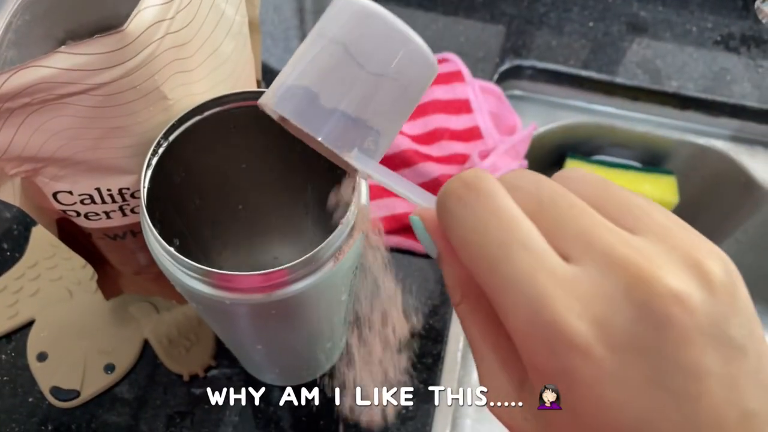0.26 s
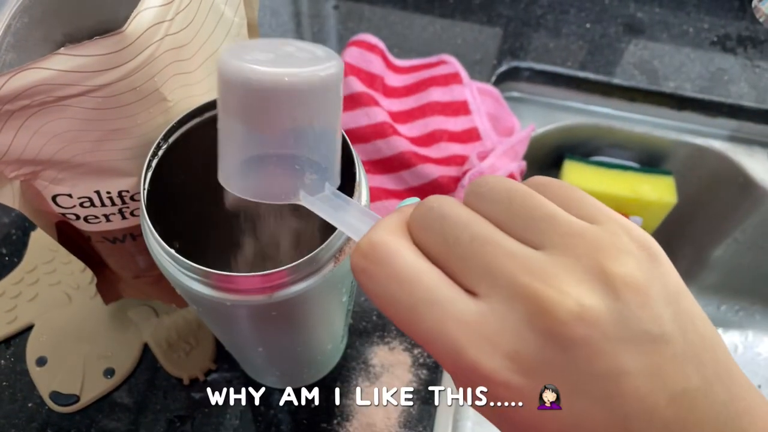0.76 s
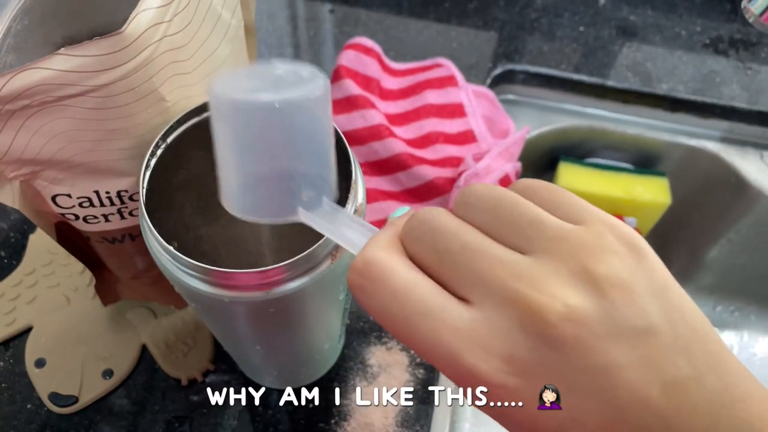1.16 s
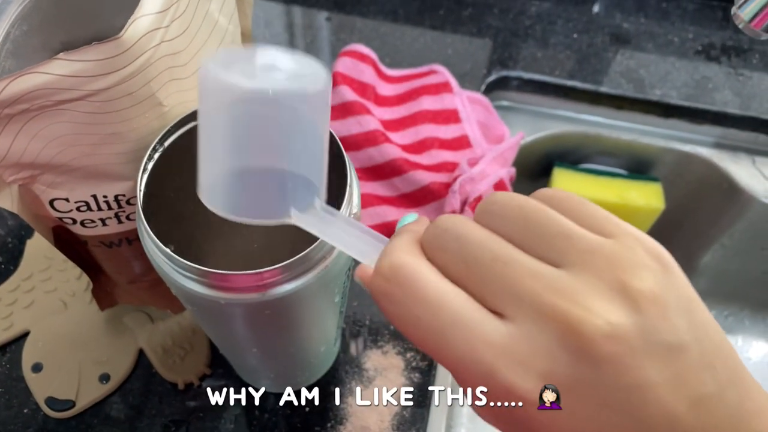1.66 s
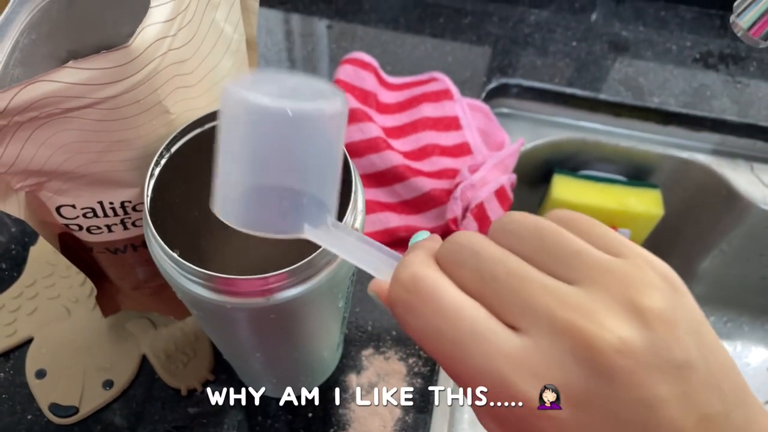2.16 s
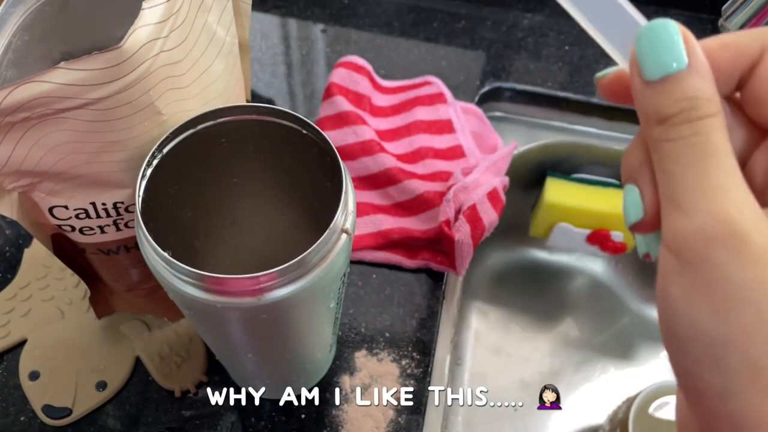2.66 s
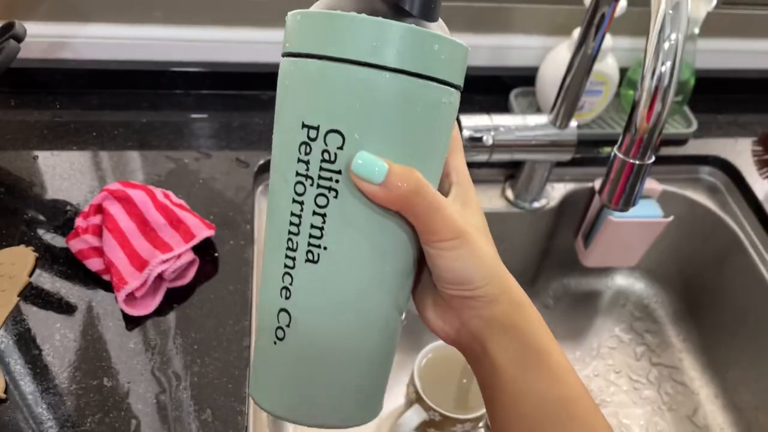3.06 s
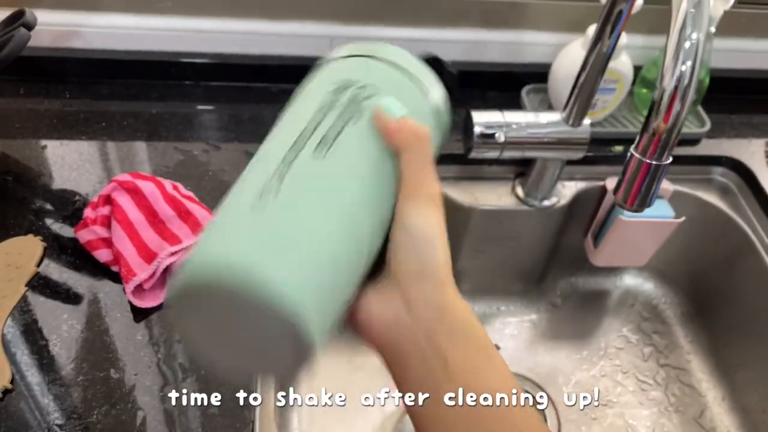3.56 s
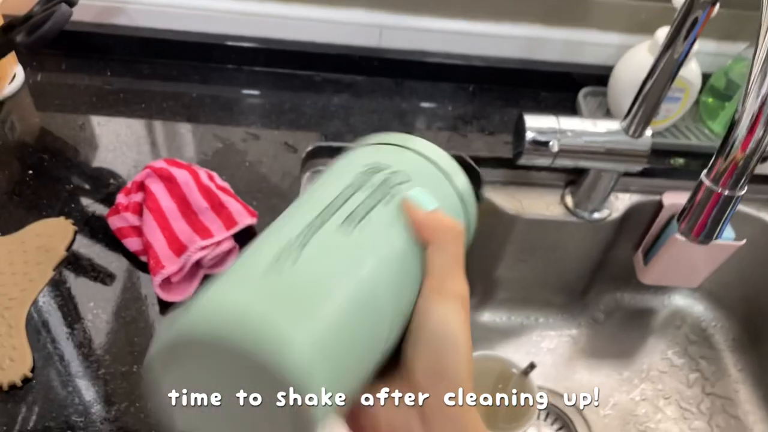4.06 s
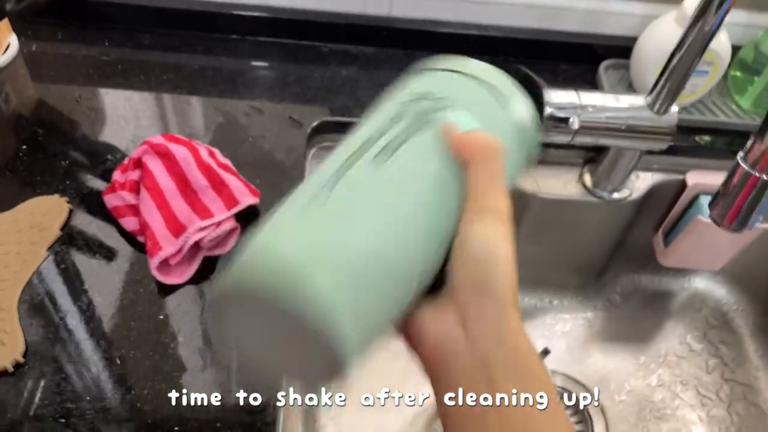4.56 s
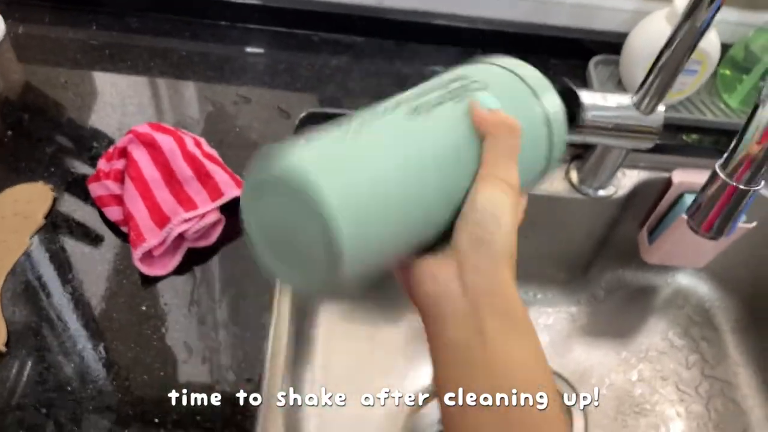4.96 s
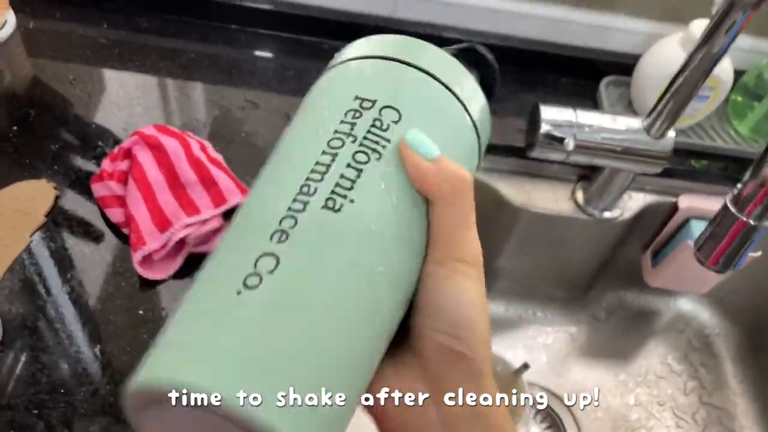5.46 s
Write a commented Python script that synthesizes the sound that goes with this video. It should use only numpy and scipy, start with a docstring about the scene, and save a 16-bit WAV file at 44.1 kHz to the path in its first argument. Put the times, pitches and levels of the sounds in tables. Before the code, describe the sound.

Powder patters from a plastic scoop, hollow knocks ring on a metal bottle rim, then the closed bottle is shaken with accelerating, sloshing rattles.

```python
"""A plastic scoop is knocked empty on the rim of a steel shaker bottle: cup, edge, bottle body and steel wall ring.
Before and between the knocks, powder patters as many tiny grains of noise, in clumps over a thin trickle.
After a cut the capped bottle is shaken: bunches of contacts make the drink and mixer slap its ends,
froth fizzes, the drink sloshes and air pockets gurgle.
Filtered noise gives soft swishes, a small kitchen's low hum and its air; two dull bumps drop in pitch."""
import sys
import numpy as np
from scipy import signal
from scipy.fft import rfft, irfft, next_fast_len
from scipy.io import wavfile
from scipy.ndimage import map_coordinates

SR = 44100
rng = np.random.default_rng(int(sys.argv[2]) if len(sys.argv) > 2 else 0)


def transcribe(u):
    """Save the signal u as a 16-bit wav file named by the first command-line argument.

    u: samples, shape (n,) or (channels, n), limited to [-1, 1]; the rate is SR.
    q: integer samples, one column per channel.
    """
    v = np.clip(np.atleast_2d(u).T, -1, 1)
    q = np.round(v * 32767).astype(np.int16)
    wavfile.write(sys.argv[1], SR, q)


N = 251370

# In all tables, a fade time is the time to fall by 60 dB.
# scoop on the rim: (time [s], cup [dB], change of the cup's middle modes [dB], edge [dB],
# edge brightness [dB], bottle body [dB], steel ring [dB], contact tick [dB])
KNOCKS = [(1.2824, -31.3, -1, -47.5, 7, -48, -57, -59), (1.439, -37.2, 0, -51, 4, -53, -60, -69),
          (1.5825, -37, 0, -50, -4, -49, -65, -73.5), (1.7167, -27, 0, -35.5, -2, -45, -50.5, -59),
          (1.8646, -52, -11, -49, 1, -52, -67, -66), (2.0029, -48.5, -10, -48, -2, -49.5, -62, -58),
          (2.1517, -49.5, -9, -48, -2, -50.5, -59.5, -61)]
# the scoop's hollow cup: (pitch [Hz], width [Hz], level [dB], share in the middle modes [0-1])
CUP_MODES = [(1225, 90, -10, 0), (1330, 100, -2.5, 0), (1435, 90, -4, .5), (1550, 400, -10, 1),
             (1624, 80, 3, 1), (1805, 90, 1, 1), (2007, 60, -19, 0), (2142, 80, -4.5, 0)]
# the scoop's stiff edge and handle: (pitch [Hz], level [dB], fade time [s])
EDGE_MODES = [(2700, -9, .025), (2845, 0, .03), (3150, -10, .015), (4055, -5, .027), (4170, -12, .02),
              (4480, -15, .015), (4970, -7, .022), (5450, -10, .014), (5790, -3, .02), (6450, -11, .02),
              (6900, -20, .015), (7480, -18, .015), (7760, -18, .02)]
# the bottle's body under a knock: (pitch [Hz], width [Hz], level [dB])
BODY_MODES = [(345, 90, -9), (465, 60, -2), (540, 45, -4), (655, 50, -1), (790, 60, -1), (860, 60, -5)]
# the bottle's steel wall: (pitch [Hz], level [dB], fade time [s])
STEEL_MODES = [(558, -9, .7), (1464, -3, .2), (2386, -5, .5), (2857, -13, .25), (3735, 1, .28),
               (3743, -6, .3), (4038, -10, .14), (4955, -12, .22), (5830, -15, .16)]
# colour of the contact tick: (frequency [Hz], level per Hz [dB])
TICK_COLOUR = [(3000, -12), (7500, 2), (9500, -7), (11500, 0), (13000, 0), (16000, -8)]
# the edge grates on the rim: level under its ring, and fade time of the chatter
EDGE_GRATE_DB, EDGE_CHATTER_S = -8.5, .03
# grip and contact point change each edge mode from knock to knock: in level, in pitch (share)
EDGE_SCATTER_DB, EDGE_DETUNE = 2, .004

# the drink slaps an end of the bottle: (time [s], strength [dB], weight of body over lid [dB],
# body pitch [Hz], lid ring pitch [Hz], fade time [s], rise [s])
SLAPS = [(3.385, -64.5, -10, 1820, 3480, 0.066, 0.0007), (3.48, -76.5, -6, 2100, 2700, 0.028, 0.0013),
         (3.551, -69.5, -12.5, 1850, 3460, 0.28, .003), (3.59, -60.5, -8.5, 1750, 3700, 0.18, 0.02),
         (3.622, -54.5, -19, 1800, 3600, 0.03, 0.0023), (3.776, -63, -15, 1850, 3370, 0.038, 0.00086),
         (3.812, -55.5, -11, 1550, 3440, 0.053, 0.0036), (3.908, -65, -12, 1820, 3540, 0.067, 0.002),
         (4.017, -59, -11, 1725, 3240, 0.038, 0.0025), (4.082, -67.5, -5, 1770, 2870, 0.053, .004),
         (4.0993, -56, -9, 2150, 3260, 0.023, 0.00042), (4.202, -62, -14, 1850, 3470, 0.16, .003),
         (4.357, -62, -6, 1700, 3170, 0.25, .012), (4.4138, -56, -7, 1640, 3300, 0.043, 0.0041),
         (4.505, -54, 3, 1990, 3080, 0.034, 0.0066), (4.579, -64, 2, 1520, 3570, 0.025, 0.0034),
         (4.603, -52, -8, 1710, 3360, 0.033, .005), (4.693, -58.5, 2, 2020, 2770, 0.071, .001),
         (4.718, -59, 4, 1640, 3100, 0.032, .001), (4.768, -58, -6.5, 1800, 2800, 0.069, .0005),
         (4.78, -61.5, -10.5, 1730, 2880, 0.1, .002), (4.888, -57, 6.5, 1900, 2760, 0.033, .0006),
         (4.988, -46, -5, 1830, 3300, 0.049, 0.00065), (4.996, -49.5, -4.5, 1810, 3800, 0.048, .005),
         (5.0987, -54, 6, 2080, 2870, 0.03, 0.00024), (5.202, -67, -11, 1860, 3600, 0.031, 0.0035),
         (5.322, -55.5, 1, 1780, 3640, 0.24, .002), (5.346, -44.5, -8.5, 1700, 3450, 0.14, 0.009),
         (5.483, -55, -14, 1900, 5440, .04, .001), (5.522, -64, 12, 1830, 3340, 0.11, .002),
         (5.575, -56.5, -10.5, 1850, 3300, 0.085, 0.0044)]
# spray spits against the wall between the slaps: (time [s], strength [dB],
# brightness, splash over ring [dB], fade time [s])
SPITS = [(3.362, -64.5, -9, 0.028), (3.446, -82, -11, 0.077), (3.535, -65, 7, 0.26), (3.733, -59, 1, 0.023),
         (3.83, -61, 5, 0.02), (3.915, -63, -5, .04), (3.958, -62.5, 15, 0.035), (3.974, -65, 12, 0.046),
         (4.07, -67, 0, .0091), (4.137, -59.5, 1, 0.0098), (4.1995, -60.5, 14, 0.043),
         (4.26, -72, 2, 0.0057), (4.277, -71, -8, 0.01), (4.2934, -64.5, 4, 0.0069),
         (4.309, -55, -3.5, 0.025), (4.498, -68, 4, 0.013), (4.505, -59.5, 12.5, 0.046),
         (4.562, -61.5, 17.5, 0.12), (4.733, -57, -5, 0.24), (4.764, -55, 4, .035), (4.79, -59.5, -5, .02),
         (4.814, -62, 6, .06), (4.923, -67, 1.5, 0.013), (4.954, -52.5, 9.5, 0.087),
         (5.102, -58.5, 3, 0.0075), (5.123, -58.5, 1, .03), (5.132, -58, 10, 0.091),
         (5.159, -62, 22.5, 0.024), (5.2404, -57.5, 4, .01), (5.243, -63.5, 5, 0.017),
         (5.2561, -49.5, 5, 0.014), (5.266, -63.5, 2.5, 0.028), (5.361, -52.5, 18.5, 0.1),
         (5.4385, -63, 13, .012), (5.486, -51, 9.5, 0.034), (5.5197, -56, 17, .04),
         (5.5456, -55.5, 13, .006), (5.548, -57.5, 13, 0.019), (5.616, -51, 5.5, 0.067)]
# the filled bottle's body: (multiple of the body pitch, width [Hz], level [dB])
CLUNK_MODES = [(.42, 160, -1), (.74, 323, 5), (1, 500, 5.5), (1.2, 460, 7.5)]
# the lid: (multiple of the ring pitch, width [Hz], level [dB])
LID_MODES = [(.79, 460, -1), (1, 320, 8), (1.18, 500, -1), (1.551, 1353, -2.5)]
# colour of the spray: (frequency [Hz], level per Hz [dB])
SPLASH_COLOUR = [(500, -18), (1200, -11), (2500, -5), (5000, 2), (7500, 3.5), (10000, 0), (13000, 0),
                 (16000, -8)]
LID_HZ, SPIT_HZ = 3190, 5790  # the lid's main and high ring under spray
SPIT_LID_DB = -5.5  # the lid's main ring under a spit, relative to its high ring
SLAP_SPLASH_DB = -10  # spray thrown by an evenly weighted slap, relative to the slap
LID_SCATTER_DB = 1.5  # the drink loads the lid differently at each hit, so its modes change in strength

# vigour of the shaking: (time [s], effort [dB])
EFFORT = [(3.55, -90.5), (3.66, -78.5), (3.8, -81.5), (4.05, -74.5), (4.22, -72), (4.49, -69.5),
          (4.83, -63.5), (5.23, -61.5), (5.69, -59)]
# the froth's level briefly changes, mostly falling quiet with the drink in mid-flight:
# (middle [s], change [dB], time from the middle to a third of the change [s])
LULLS = [(3.48, -4.5, 0.0336), (3.897, 1.5, 0.037), (4.549, -8, 0.016), (4.678, -1.5, .03),
         (4.874, -8, 0.05), (4.927, -2, .02), (5.092, -4, 0.016), (5.293, -1, .02)]
# colour of the froth: (frequency [Hz], level per Hz [dB])
FROTH_COLOUR = [(400, -12), (1000, -3), (2000, -1), (3400, 2), (4600, -1), (8000, -1), (12000, -2),
                (16000, -8)]
# colour of the churning drink: (frequency [Hz], level per Hz [dB])
SLOSH_COLOUR = [(100, -20), (220, -4.5), (380, 0), (800, -6.5), (1500, -10), (4000, -28)]
# the drink starts to move, is in full swing; its level at the start, relative to full swing
SHAKE_START_S, SHAKE_FULL_S, RESTING_DB = 3.37, 3.6, -12
# froth level at a reference effort; froth dB per dB of effort; that effort
FROTH_DB, FROTH_GROWS, FROTH_REF_DB = -59.5, 0.56, -68.5
WASH_DB, WASH_RISE_S = -17.5, .027  # froth stirred up by each slap, relative to the slap
# air pockets: rate, middle pitch, life in cycles, pitch rise per life (share), level over the effort
GURGLES_PER_S, GURGLE_HZ, GURGLE_CYCLES, GURGLE_RISE, GURGLE_DB = 26, 400, 4, .2, 6

# clumps of powder leave the scoop: (start [s], peak level [dB], rise [s])
CLUMPS = [(-.01, -75, 0.016), (.175, -64, 0.021), (.478, -67, 0.011), (.665, -74.5, 0.032),
          (.75, -76.5, 0.026), (.87, -85, .035), (1.018, -62.5, 0.017), (1.145, -71.5, 0.0066)]
# colour of the powder: (frequency [Hz], level per Hz [dB])
POWDER_COLOUR = [(2000, -14), (5000, -4), (7800, 2), (10000, -1), (15500, 0)]
TRICKLE_DB, POUR_END_S = -87.5, 1.5  # the thin stream between the clumps

# dull bumps: (start [s], level [dB], time to the peak [s])
BUMPS = [(1.3663, -45, 0.0078), (5.238, -51, 0.0047)]
BUMP_FROM_HZ, BUMP_TO_HZ, BUMP_FALL_S = 597, 110, 0.004  # the pitch drops at once

# soft swishes, mostly as the hand moves; the first is powder spilling: (middle [s], level [dB], length [s])
SWISHES = [(0.232, -69, 0.11), (1.522, -63.5, 0.089), (2.47, -68, 0.066), (2.883, -65, 0.069)]
# colour of the swishes: (frequency [Hz], level per Hz [dB])
SWISH_COLOUR = [(3000, -25), (5500, -10), (6700, 1), (8000, 1), (9300, -10), (12500, -12), (14000, -26)]

# the hum's resonances: (pitch [Hz], width [Hz], level [dB])
HUM_PEAKS = [(64.9, 7.6, -1.5), (129.1, 10, 1), (151.7, 11, -2), (251.5, 90, -18), (372, 13, -12.5),
             (569.4, 44, -13)]
# colour of the air before the cut: (frequency [Hz], level per Hz [dB])
AIR_COLOUR = [(30, -20), (150, -8), (380, -2), (470, -8), (560, -4), (750, -3), (1150, 1.5), (1450, -2),
              (1750, -8), (2350, -12.5), (2750, -12), (3300, -19.5), (5000, -23.5), (7800, -26),
              (9800, -42), (12000, -41), (13500, -43), (15000, -53)]
# colour of the low rush that comes with the swell: (frequency [Hz], level per Hz [dB])
RUMBLE_COLOUR = [(100, -20), (170, -3), (240, 0), (340, -2), (450, -12), (700, -20), (1500, -50)]
# colour of the air after the cut: (frequency [Hz], level per Hz [dB])
QUIET_COLOUR = [(30, -12), (300, 0), (1200, -1), (2500, -6), (7000, -21), (15000, -42)]
# the background swell: (begins [s], is full [s], starts to fade [s], would be gone [s])
SWELL_S = (1.05, 1.75, 2.45, 3.101)
CUT_S = 2.972
HUM_DB, AIR_DB = -59.5, -58  # resting levels before the cut
HUM_SWELL_DB, AIR_SWELL_DB = 12, 5  # how far each rises in the swell
RUMBLE_DB = -61.5  # middle level at the height of the swell
# after the cut: hum level, its rise, and when it rises
LATE_HUM_DB, RETURN_DB, RETURN_S = -79.5, 20.5, (3.75, 5.15)

# how alike left and right are in the room: (frequency [Hz], likeness [-1 to 1])
ROOM_ALIKE = [(150, .8), (290, 0), (450, -.35), (700, -.1), (2500, .15), (6000, .15), (8500, -.6),
              (13000, .55)]
# how alike left and right are for sounds at the bottle: (frequency [Hz], likeness [-1 to 1])
BOTTLE_ALIKE = [(290, .85), (700, .5), (1400, .35), (5500, .45), (7000, 0), (8200, -.75), (9900, -.92),
                (11500, .55), (14000, .7)]
# how long the walls echo: (frequency [Hz], fade time [s])
WALLS = [(200, .12), (1500, .15), (5000, .18), (14000, .03)]
TOP_HZ = 16200  # nothing is heard from here up


def scoop():
    """Each knock rings plastic, bottle body and, thinly, steel; the counter returns it at once, then the walls."""
    out, steel = np.zeros((2, N)), np.zeros((2, N))
    t = np.arange(SR // 2) / SR
    lead = round(.004 * SR)  # silence ahead of the blow leaves room for its soft onset
    padded = lambda x: np.pad(x, ((0, 0), (lead, 0)))
    for s, cup_db, middle_db, edge_db, bright_db, body_db, steel_db, tick_db in KNOCKS:
        blow = np.zeros((2, len(t)))
        blow[:, 0] = 1
        blow[:, round(.0024 * SR)] = .35  # the quick return
        chatter = rng.standard_normal(blow.shape) * amp(-60 * t / EDGE_CHATTER_S)

        # the small cup radiates little bass, and its plastic gives on contact, so it gets little treble
        soft_colour = [(500, -14), (950, -10), (1220, 0), (2150, 0), (2350, -17), (3200, -23), (9000, -34)]
        soft = coloured(padded(blow + .025 * chatter), soft_colour)
        cup_peaks = [(hz, width, db + share * middle_db) for hz, width, db, share in CUP_MODES]
        cup = amp(cup_db) * burst(resonate(soft, cup_peaks, sign=1.0))

        tilt = [(4000, 0), (5700, bright_db)]
        held = [(hz * rng.normal(1, EDGE_DETUNE), rng.normal(db + along(tilt, hz), EDGE_SCATTER_DB), t60)
                for hz, db, t60 in EDGE_MODES]
        singing = burst(padded(ring(held, t)))
        grate_colour = [(1200, -15), (2800, 0), (6000, -3), (8000, -10), (10000, -30)]
        grating = burst(coloured(padded(chatter), grate_colour))
        edge = amp(edge_db) * (singing + amp(EDGE_GRATE_DB) * grating)
        edge = edge * amp([[-.6], [.6]])  # a little to the right

        # each knock lands elsewhere on the rim and favours other modes of the body
        spot = [(hz, width, db + rng.normal(0, 2.5)) for hz, width, db in BODY_MODES]
        body = amp(body_db) * burst(resonate(padded(blow + .05 * chatter), spot))
        tick = amp(tick_db) * burst(coloured(padded(chatter), TICK_COLOUR))

        knock = cup + edge + body + tick
        add(steel, s, amp(steel_db) * ring(STEEL_MODES, t))
        add(out, s - lead / SR, knock)
        add(out, s - lead / SR, amp(-9.5) * room(knock, delay=0.003))
    waver = amp(2 * wobble(45))  # the thin steel ring wavers as it dies
    return (out + waver * steel) * amp([[-1.1], [1.1]])


def slaps():
    """Slaps knock the body, ring the lid and throw spray; spits of spray mostly splash and ring higher."""
    out = np.zeros((2, N))
    clatter = grains(rate=800, scatter_db=3, life=.0004) + rng.normal(0, .35, (2, N))
    for s, db, weight_db, body_hz, ring_hz, length, rise in SLAPS:
        hits = contacts(clatter, length, rise)
        body_peaks = [(k * body_hz, width, level) for k, width, level in CLUNK_MODES]
        clunk = amp(weight_db / 2) * burst(resonate(hits, body_peaks))
        ringing = amp(-weight_db / 2) * lid(hits, ring_hz)
        # heavier slaps throw slightly less spray
        splash = amp(SLAP_SPLASH_DB - 0.07 * weight_db) * burst(coloured(hits, SPLASH_COLOUR))
        add(out, s, amp(db) * (clunk + ringing + splash))
    for s, db, bright_db, length in SPITS:
        hits = contacts(clatter, length)
        ringing = lid(hits, SPIT_HZ) + amp(SPIT_LID_DB) * lid(hits, LID_HZ)
        splash = burst(coloured(hits, SPLASH_COLOUR))
        add(out, s, amp(db) * (amp(bright_db / 2) * splash + amp(-bright_db / 2) * ringing))
    return spread(out, BOTTLE_ALIKE) * amp([[-.4], [.4]])


def contacts(clatter, length, rise=0):
    """A clump of small contacts that builds and dies; with no rise, one sharp contact leads."""
    t = np.arange(SR // 5) / SR
    start = rng.integers(N - len(t))
    clump = clatter[:, start:start + len(t)] * amp(-60 * t / length)
    if rise:
        return clump * (1 - np.exp(-t / rise))
    # the first contact is strong in the middle; it stands out most in short spits
    first = rng.standard_normal((2, len(t))) * amp(-60 * t / .003)
    strength = np.sqrt(.18 / length) * np.exp(-length / .1)
    return clump + np.array([[1], [.3]]) * first * strength


def lid(hits, ring_hz):
    """The lid rings around one pitch, with a new colour each time."""
    shifts_db = LID_SCATTER_DB * rng.standard_normal(len(LID_MODES))
    peaks = [(k * ring_hz, width, db + shift) for (k, width, db), shift in zip(LID_MODES, shifts_db)]
    return burst(resonate(hits, peaks))


def drink():
    """Liquid churns in lumps, froth fizzes and drops tick on the wall, with the effort; slaps stir up froth."""
    effort_db, = curves(EFFORT)
    moving = after(SHAKE_START_S) * amp(ramp([SHAKE_START_S, SHAKE_FULL_S], [RESTING_DB, 0]))
    t = np.arange(N) / SR
    lull_db = sum(dip_db * np.exp(-((t - s) / length) ** 2) for s, dip_db, length in LULLS)

    fizz = grains(rate=800, scatter_db=4, life=.0012)
    drops = .62 * grains(rate=90, scatter_db=4, life=.0005)
    crackle = unit(spread(coloured(fizz + drops, FROTH_COLOUR), BOTTLE_ALIKE))
    steady = moving * amp(FROTH_DB + lull_db + FROTH_GROWS * (effort_db - FROTH_REF_DB))
    wash = sum(amp(db + WASH_DB) * surge(s, WASH_RISE_S) for s, db, *_ in SLAPS)
    froth = np.hypot(steady, wash) * amp(0.64 * wobble(35)) * crackle

    lumps = grains(rate=200, scatter_db=4.5, life=0.0113)
    churning = unit(spread(coloured(lumps, SLOSH_COLOUR), BOTTLE_ALIKE))
    slosh = moving * amp(effort_db + 0.26) * churning
    return froth + slosh


def gurgles():
    """Air pockets rolling through the drink ring briefly and rise in pitch, louder with the effort."""
    out, t = np.zeros((2, N)), np.arange(SR // 10) / SR
    count = round(GURGLES_PER_S * (N / SR - SHAKE_FULL_S))
    times = rng.uniform(SHAKE_FULL_S, N / SR, count)
    for s, (size, strength) in zip(times, rng.standard_normal((count, 2)).clip(-2, 2)):
        hz = GURGLE_HZ * np.exp(.35 * size)
        age = t * hz / GURGLE_CYCLES  # in lives
        envelope = np.exp(-age) * (1 - np.exp(-10 * age))
        tone = np.sin(2 * np.pi * hz * t * (1 + GURGLE_RISE * age / 2)) * envelope
        effort_db = np.interp(s, *np.transpose(EFFORT))
        add(out, s, amp(effort_db + GURGLE_DB + 2 * strength) * tone)
    return out


def powder():
    """Grains patter into the bottle and on the counter: clumps of noise bursts over a trickle that stops."""
    trickle = amp(TRICKLE_DB) * (1 - after(POUR_END_S))
    flow = trickle + sum(amp(db) * surge(s, rise) for s, db, rise in CLUMPS)
    fine_grains = grains(rate=4000, scatter_db=12.5, life=0.0015)
    return flow * unit(spread(coloured(fine_grains, POWDER_COLOUR), BOTTLE_ALIKE))


def bump():
    """Soft, dull bumps: a sine whose pitch drops quickly while its level swells and dies."""
    out, t = np.zeros((2, N)), np.arange(SR // 4) / SR
    hz = BUMP_TO_HZ + (BUMP_FROM_HZ - BUMP_TO_HZ) * np.exp(-t / BUMP_FALL_S)
    tone = np.sin(2 * np.pi * np.cumsum(hz) / SR)
    for s, db, swell in BUMPS:
        u = t / swell
        add(out, s, amp(db) * u * np.exp(1 - u) * tone)
    return out


def swishes():
    """Brief, soft, high rubbing noises that swell and fade."""
    t = np.arange(N) / SR
    swell = sum(amp(db) * np.exp(-2 * ((t - s) / length) ** 2) for s, db, length in SWISHES)
    return swell * rush(SWISH_COLOUR, ROOM_ALIKE) * (1 - after(CUT_S))


def kitchen():
    """Hum and air, as filtered noise, swell together; after the cut both are much quieter, then hum creeps back."""
    swell = ramp(SWELL_S, [0, 1, 1, 0])
    hum_db = HUM_DB + HUM_SWELL_DB * swell
    air_db = AIR_DB + AIR_SWELL_DB * swell + 1.2 * wobble(8.98)
    late_hum_db = LATE_HUM_DB + ramp(RETURN_S, [0, RETURN_DB])
    drone_colour = [(20, -14), (55, 0), (600, 0), (2000, -30)]
    drone = coloured(resonate(rng.standard_normal(N), HUM_PEAKS), drone_colour)
    rumble = swell * amp(RUMBLE_DB + 2 * wobble(12)) * rush(RUMBLE_COLOUR, ROOM_ALIKE)
    early = amp(hum_db) * two_ears(drone, -0.68) + amp(air_db) * rush(AIR_COLOUR, ROOM_ALIKE) + rumble
    late = amp(late_hum_db) * two_ears(drone, 0.28) + amp(-77.0) * rush(QUIET_COLOUR, ROOM_ALIKE)
    return early * (1 - after(CUT_S)) + late * after(CUT_S)


def two_ears(drone, lead):
    """The hum reaches the two microphones out of step, more so in its upper tones."""
    sides = np.array([[1], [-1]])
    shifted = filtered(drone, lambda hz: np.exp(.5j * lead * (1 + hz / 250) * sides))
    return unit(shifted) * amp([[-.9], [.9]])


def room(x, delay):
    """The walls' answer, a fading noise tail: each frequency dies at its own speed."""
    hz, t, z = signal.stft(rng.standard_normal((2, SR // 2)), SR, nperseg=256)
    fade = amp(-60 * t / along(WALLS, hz)[:, None])
    tail = signal.istft(z * fade, SR, nperseg=256)[1]
    tail = np.pad(tail / np.linalg.norm(tail[0]), ((0, 0), (round(delay * SR), 0)))
    return signal.fftconvolve(x, tail, axes=1)[:, :N]


def ring(modes, t):
    """Struck modes; each reaches the two microphones with its own strength and phase."""
    hz, db, t60 = np.transpose(modes)[:, :, None]
    size, phase = rng.standard_normal((2, 2, len(modes), 1))
    waves = amp(db + size - 60 * t / t60) * np.sin(2 * np.pi * hz * t + .5 * phase)
    return waves.sum(1) * (1 - np.exp(-t / 0.0022))  # soft onset


def grains(rate, scatter_db, life):
    """Two noises made of tiny bursts of uneven size, rms 1; rate per second, life in seconds."""
    sizes = amp(scatter_db * np.clip(rng.standard_normal(N), -2, 2))
    births = (rng.random(N) < rate / SR) * sizes
    power = signal.lfilter([1], [1, -np.exp(-1 / (life * SR))], births ** 2)
    return unit(np.sqrt(power) * rng.standard_normal((2, N)))


def rush(spectrum, alike):
    """Smooth stereo noise of rms 1."""
    return unit(spread(coloured(rng.standard_normal((2, N)), spectrum), alike))


def spread(pair, alike):
    """Two unrelated signals become left and right of a given likeness."""
    turn = lambda hz: np.arccos(np.clip(along(alike, hz), -1, 1)) / 2
    mid, side = filtered(pair, lambda hz: np.array([np.cos(turn(hz)), np.sin(turn(hz))]))
    return np.array([mid + side, mid - side])


def resonate(x, peaks, sign=-1):
    """x through (Hz, width, dB) resonances; neighbours swing against each other, or in step for sign 1."""
    def response(f):
        return sum(sign ** k * amp(db) * 1j * f * width / (hz * hz - f * f + 1j * f * width)
                   for k, (hz, width, db) in enumerate(peaks))
    return filtered(x, response)


def coloured(x, spectrum):
    """x shaped by a curve of (Hz, dB) points."""
    return filtered(x, lambda hz: amp(along(spectrum, hz)))


def filtered(x, response):
    """x times a response of frequency, which may be complex."""
    n = x.shape[-1]
    m = next_fast_len(n + 8192)  # room for the filter to ring out
    return irfft(rfft(x, m) * response(np.fft.rfftfreq(m, 1 / SR)), m)[..., :n]


def along(points, hz):
    """Read a curve of (Hz, value) points on a log axis."""
    f, v = np.transpose(points)
    return np.interp(np.log(hz + 1), np.log(f + 1), v)


def curves(rows):
    """One value per sample for each column after the time."""
    s, *cols = np.transpose(rows)
    return [np.interp(np.arange(N) / SR, s, c) for c in cols]


def ramp(times, values):
    """Straight lines through values at times, one value per sample."""
    return np.interp(np.arange(N) / SR, times, values)


def after(s):
    """A switch that opens within 10 ms, centred on time s."""
    return np.clip((np.arange(N) / SR - s) / .01 + .5, 0, 1)


def surge(s, rise):
    """An envelope that starts at s, peaks at 1 after rise seconds and dies away."""
    u = np.maximum(np.arange(N) / SR - s, 0) / rise
    return u * np.exp(1 - np.minimum(u, 50))


def wobble(rate):
    """A smooth random curve, rate knots a second."""
    return map_coordinates(rng.standard_normal(int(N * rate / SR) + 4), [np.arange(N) * rate / SR])


def add(track, s, sound):
    """Mix a sound in at time s."""
    part = track[:, max(round(s * SR), 0):][:, :sound.shape[-1]]
    part += sound[..., :part.shape[-1]]


def burst(x):
    """Scale a short stereo sound to the energy of 20 ms at rms 1."""
    return x / np.sqrt(np.sum(x ** 2) / (2 * .02 * SR) + 1e-20)


def unit(x):
    """Scale to rms 1."""
    return x / np.sqrt(np.mean(x ** 2) + 1e-20)


def amp(db):
    """Decibels to gain."""
    return 10 ** (np.asarray(db) / 20)


def scene():
    """All sources in the kitchen."""
    slapping = slaps()
    shaking = slapping + amp(-6.5) * room(slapping, delay=.004) + drink() + gurgles()
    return scoop() + shaking + powder() + bump() + swishes() + kitchen()


def record(dry):
    """Keep nothing from the top frequency up."""
    return filtered(dry, lambda hz: hz < TOP_HZ)


dry = scene()
out = record(dry)
transcribe(out)
```